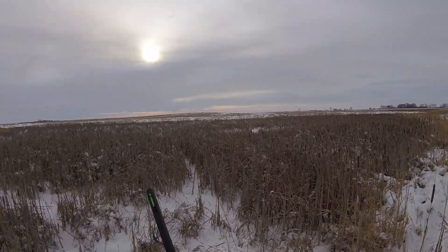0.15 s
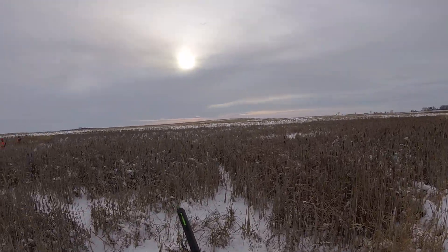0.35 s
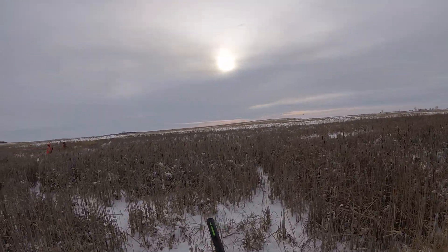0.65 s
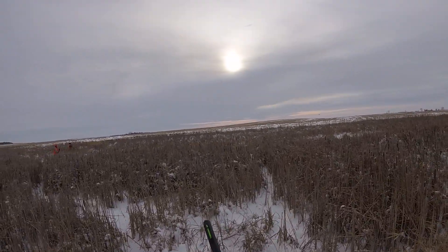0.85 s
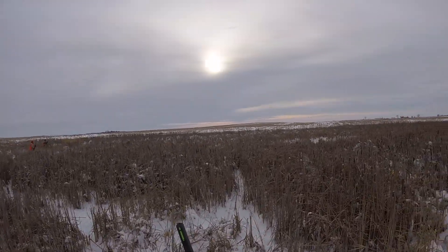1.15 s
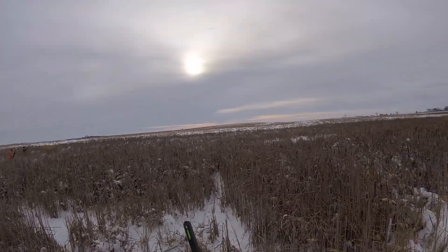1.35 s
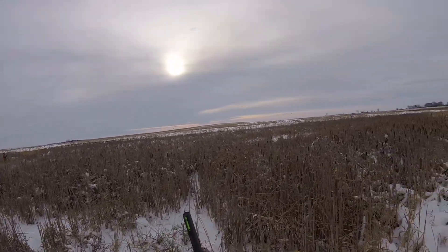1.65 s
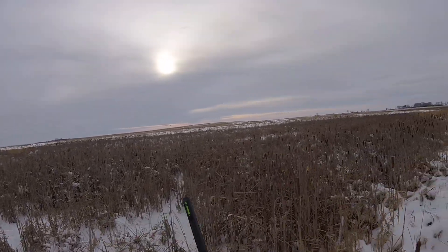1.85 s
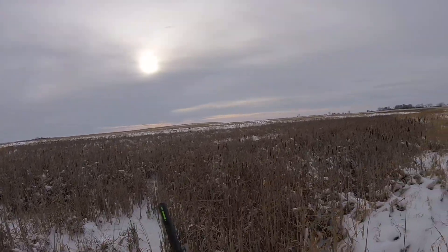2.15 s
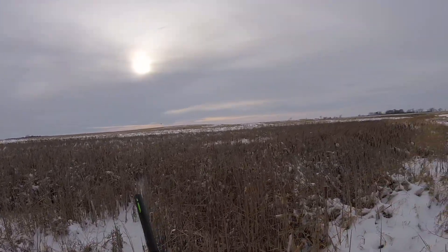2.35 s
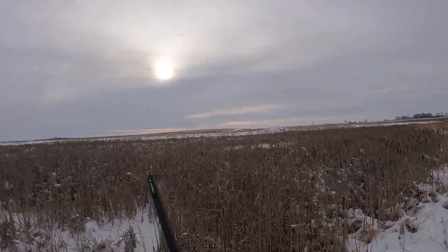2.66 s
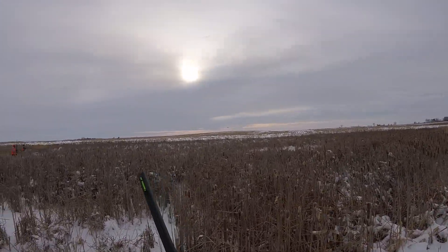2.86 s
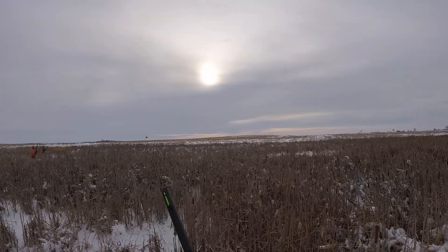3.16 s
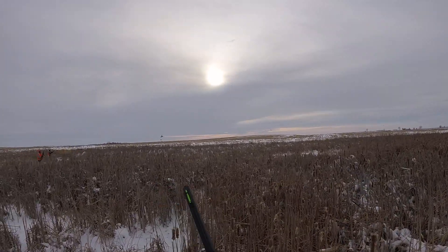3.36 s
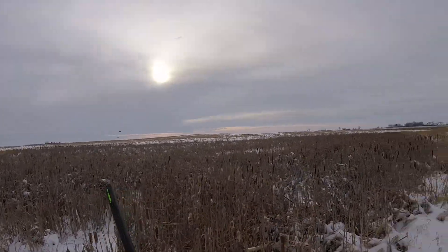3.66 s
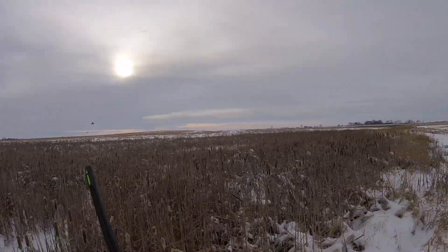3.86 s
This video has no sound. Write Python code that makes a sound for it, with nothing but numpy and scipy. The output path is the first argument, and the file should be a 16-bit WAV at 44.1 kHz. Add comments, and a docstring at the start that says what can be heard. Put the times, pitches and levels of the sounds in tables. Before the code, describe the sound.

Uneven wind noise presses on a close outdoor microphone, light at first, then a heavy thumping gust in the last second or so, while brittle stems tick and crackle through a fine grassy hiss.

```python
"""Wind buffets a small head-worn microphone on an open snowy prairie, for four seconds.
From the start, shaped noise makes a lumpy rumble, a hiss of wind in the grass and a fine crackle of dry reeds.
Soon short swinging waves add thumps and pops, and ringing ticks with noise sprays add snapping stems.
At 2.66 s the head turns and the treble of the reeds changes colour.
Around then the wind builds into a strong gust, with its hardest thump at about 3.3 s."""
import sys
import numpy as np
from scipy import signal
from scipy.fft import rfft, irfft
from scipy.io import wavfile
from scipy.ndimage import uniform_filter1d

SR = 44100
rng = np.random.default_rng(int(sys.argv[2]) if len(sys.argv) > 2 else 0)


def dump(signal):
    """Clip the signal to [-1, 1] and save it as 16-bit WAV at the path in sys.argv[1]."""
    limited = np.clip(np.atleast_2d(signal).T, -1, 1)
    pcm = np.round(limited * 32767).astype(np.int16)
    wavfile.write(sys.argv[1], SR, pcm)


N = 176400  # length in samples: 4 s

# Strength of the buffeting: t/s, deep rumble level/dB, upper flutter level/dB
GUST_LEVELS = [(0,-29.5,-45.5),(.07,-36,-47),(.4,-40.5,-46),(.47,-46.5,-51.5),(.64,-37,-42.5),(.72,-37.5,-45.5),(.78,-32,-34.5),(.86,-38,-44),(1.05,-29,-34.5),(1.12,-23,-35.5),(1.19,-30,-48.5),(1.27,-31.5,-50.5),(1.58,-39.5,-53.5),(1.69,-26.5,-46.5),(1.77,-28,-40.5),(2.02,-35,-46.5),(2.17,-30,-45.5),(2.27,-30.5,-39),(2.5,-27.5,-34),(2.6,-23,-32.5),(2.8,-21.5,-25),(2.86,-16.5,-28),(2.98,-14.5,-21),(3.07,-16.5,-14.5),(3.14,-13,-22.5),(3.27,-15,-27),(3.32,-10,-17.5),(3.42,-21,-26.5),(3.54,-11,-23.5),(3.6,-20.5,-40.5),(3.67,-12,-19.5),(3.77,-21,-37),(3.86,-14.5,-34.5),(3.94,-23,-37.5)]
# Tone of the deep rumble in light air: f/Hz, relative level/dB (per Hz)
RUMBLE_TONE = [(12,6),(33,3.5),(64,-0.5),(90,-10),(130,-32),(400,-61)]
# Tone of the upper flutter: f/Hz, relative level/dB (per Hz)
FLUTTER_TONE = [(60, -56), (110, -2), (170, 4.5), (230, -7.5), (330, -16), (500, -26.5), (900, -41),
                (1500, -46.5), (3000, -96)]
# Wind in the grass, strength of the mid roar: t/s, level/dB
ROAR_LEVELS = [(0,-55.5),(.85,-58),(.95,-55),(1.15,-55),(1.25,-57.5),(1.35,-50.5),(1.41,-54.5),(1.8,-52.5),(2.0,-56.5),(2.07,-54),(2.2,-57.5),(2.6,-53.5),(2.8,-51),(2.86,-49.5),(3.03,-54.5),(3.08,-46),(3.14,-54),(3.27,-48),(3.3,-42.5),(3.4,-48),(3.45,-50.5),(3.75,-51),(3.81,-49.5),(4,-48.5)]
# Tone of that roar: f/Hz, relative level/dB (per Hz)
ROAR_COLOUR = [(120,-36),(250,-6),(650,-10.5),(1000,-11.5),(1450,-15.5),(2000,-19.5),(3000,-24),(4000,-30.5),(4800,-37.5),(6000,-65)]
# Tone of the fine hiss of the air: f/Hz, relative level/dB (per Hz)
HISS_TONE = [(2500,-43),(4000, -33), (6000, -4), (9000, -5.5), (12000, -13), (15300, -15.5)]
# Reeds dragging past the legs: t/s, level/dB
BRUSH_LEVELS = [(0,-64),(.25,-71),(.54,-68),(.6,-61.5),(.66,-70),(1.28,-71.5),(1.36,-62.5),(1.46,-66),(1.52,-60),(1.75,-60),(1.92,-63.5),(2.0,-69),(2.08,-64.5),(2.3,-63),(2.52,-63),(2.6,-55),(2.72,-59),(2.84,-50.5),(2.94,-57),(3.24,-56.5),(3.3,-52),(3.38,-45.5),(3.44,-49),(3.48,-51.5),(3.54,-52.5),(3.6,-53),(3.8,-51.5),(3.86,-54.5),(3.94,-52),(4,-52.5)]
# Tone of the reeds before the head turns: f/Hz, relative level/dB (per Hz)
FACING_AWAY_TONE = [(2240, -8), (3800, -6), (4690, -18), (5210, -10), (5750, -1.5), (6460, 2), (8010, -5.5),
                    (14700, -26), (15300, -44)]
# Tone of the reeds after the head turns: f/Hz, relative level/dB (per Hz)
FACING_IN_TONE = [(2240, -17), (3800, -17), (4370, -18), (5030, -6), (5420, -2), (5950, -8.5), (6530, -5),
                  (7210, -10), (10100, -13.5), (10500, -13.5), (11500, -39), (14000, -28), (15300, -44)]
# Eddies that hit the microphone port: t/s, peak level/dB, f/Hz that the pitch sags towards
THUMP_EVENTS = [(0.204, -40, 240), (0.33, -31, 177), (0.66, -33, 136), (0.773, -23, 138), (1.1, -31, 220),
                (1.709, -20.5, 161), (1.789, -30.5, 146), (2.062, -28.5, 180), (2.612, -25.5, 192),
                (2.775, -21, 230), (2.953, -26, 157), (3.061, -14, 185), (3.312, -8.5, 110.7),
                (3.594, -17, 118), (3.651, -16.5, 152)]
# Stems snapping: t/s, tick level/dB, tick f/Hz, knock level/dB (relative to the tick)
SNAP_EVENTS = [(.301,-44.5,6900,4),(0.6693,-36.5,6700,-5.5),(1.3327,-41,6440,1),(1.341,-44.5,4500,9),(1.3738,-36.5,6500,-12),(1.419,-45,3260,6),(1.496,-41,6300,5),(1.57,-39,5200,4),(1.62,-35,5860,-8),(1.667,-44,11500,-12),(1.885,-42,6040,2),(2.004,-40.5,1780,-3),(2.04,-41,6760,-20),(2.056,-40,6700,-10),(2.456,-33.5,6340,-6.5),(2.7258,-40,6800,-15),(2.7407,-29,6240,-8),(2.7434,-28,6700,-10),(2.763,-32,6400,-20),(2.777,-23.5,7000,-30),(2.8055,-37,6570,-2),(3.066,-35,5470,-1),(3.1861,-33,6500,-24),(3.21,-39,4970,-15),(3.264,-24.5,7850,-8),(3.291,-40,3000,2),(3.301,-34,1500,3),(3.3672,-32,5650,-9),(3.372,-35,1700,-5),(3.438,-33.5,2200,-6),(3.503,-31,6700,-26),(3.5267,-34,7850,-19),(3.561,-37.5,9300,-25),(3.6,-32,5600,-20),(3.6346,-27,5640,-8),(3.637,-31,5640,-22),(3.7,-24,6100,-10),(3.733,-30.5,7300,-25),(3.808,-33,5570,-15),(3.9542,-34,5500,-17)]
# Short pops from the port: t/s, peak level/dB, f/Hz that the pitch sags towards
POP_EVENTS = [(0.309, -43, 910), (0.513, -42.5, 840), (0.673, -35, 290), (0.931, -42.5, 710),
              (1.374, -33.5, 805), (1.939, -40, 610), (2.004, -44, 516), (2.054, -42.5, 1060),
              (2.114, -42, 850), (2.316, -40.5, 590), (2.456, -41, 540), (2.606, -36.5, 325),
              (2.806, -28, 780), (2.907, -33, 530), (2.96, -26, 470), (2.983, -38, 454),
              (3.007, -21.5, 500), (3.0615, -22, 500), (3.0735, -22, 500), (3.0855, -30.5, 600),
              (3.114, -27, 610), (3.67, -35.5, 520)]

LUMPY_DB, FLUTTER_BURST_DB = 5, 2.7  # typical swing of the rumble and of the flutter
STRONG_DB, BRIGHTER = -19, 0.52  # from this rumble level up, its pitch range is wider by this share
EVEN = 0.7  # share 0-1 by which chance peaks of the buffeting are flattened
THUMP_CYCLES, THUMP_GLIDE = 1.59, 0.3  # a larger glide starts higher and sags further
POP_CYCLES, POP_GLIDE = 1.55, 0.23
SHARED_DB, BRUSH_FLICKER_DB = 0.2, 1.5  # flicker of grass and reeds together; extra for the reeds
GRAIN_DB = 2  # fast roughness of the roar
HISS_DB = -65.5
CRACKLES_PER_S, CRACKLE_SPREAD_DB, CRACKLE_SHARE = 600, 3, 0.45  # share 0-1 against smooth swish
TURN_S, TURN_LENGTH_S = 2.66, 0.1  # when the head starts to turn, and for how long
# T60 is the time to fade by 60 dB; spray levels are relative to the tick
SNAP_T60_S, KNOCK_T60_S = 0.0041, 0.0025
CRACK_DB, CRACK_T60_S = -7, 0.001
SPLINTER_DB, SPLINTER_T60_S = -19.5, 0.027
HOUSING_HZ = 12000  # the snaps are dulled above this
EDGE_HZ = 15300


def amp(db):
    """Turns decibels into a plain multiplier."""
    return 10 ** (np.asarray(db) / 20)


def unit(x):
    """Scales a signal to an average (rms) strength of 1."""
    return x / np.sqrt(np.mean(x ** 2) + 1e-20)


def on_hz(points, hz):
    """Reads a tone table at any pitch, with silence outside its ends."""
    f, db = np.transpose(points)
    return np.interp(np.log(hz + 1), np.log(f + 1), db, -np.inf, -np.inf)


def level(table, column=1):
    """Joins the levels of a table into a smooth volume curve."""
    rows = np.array(table)
    return amp(np.interp(np.arange(N) / SR, rows[:, 0], rows[:, column]))


def colour(x, points):
    """Filters a signal with the tone in a table, at rms 1."""
    gain = amp(on_hz(points, np.fft.rfftfreq(N, 1 / SR)))
    return unit(irfft(rfft(x) * gain, N))


def wobble(top_hz):
    """Makes a random wander of rms 1, faster than 6.5 Hz and fading out above top_hz."""
    spectrum = rfft(rng.standard_normal(N))
    hz = np.fft.rfftfreq(N, 1 / SR)
    return unit(irfft(spectrum * (hz > 6.5) / (1 + (hz / top_hz) ** 2), N))


def evened(x, span_s):
    """Pulls the short-time level of x part of the way to 1."""
    span = round(span_s * SR)
    power = uniform_filter1d(uniform_filter1d(x ** 2, span), span)
    return unit(x / (power + 0.071) ** (EVEN / 2))


def add(mix, s, sound):
    """Adds a short sound to the mix at s seconds."""
    part = mix[round(s * SR):][:len(sound)]
    part += sound[:len(part)]


def wavelet(db, hz, cycles, glide, phase):
    """A few swings of pressure that rise fast, sag in pitch and die away."""
    u = np.arange(0, 2, hz / cycles / SR)  # time, in units of the given number of cycles
    turns = cycles * (u + glide * (1 - np.exp(-3 * u)))
    envelope = 3 * u * np.exp(1 - 3 * u)  # peaks at 1
    return amp(db) * envelope * np.sin(2 * np.pi * (turns + phase))


def wavelets(table, cycles, glide):
    """Places one wavelet per table row, each starting at a random point of its swing."""
    out = np.zeros(N)
    for (s, db, hz), phase in zip(table, rng.random(len(table))):
        add(out, s, wavelet(db, hz, cycles, glide, phase))
    return out


def buffeting():
    """Lumpy pressure on the port: a deep rumble, and a flutter that comes in bursts."""
    bursts = wobble(top_hz=19.5)
    eddies = rng.standard_normal(N) * amp(LUMPY_DB * wobble(top_hz=6.9))
    wide_tone = [(hz * (1 + BRIGHTER), db) for hz, db in RUMBLE_TONE]
    rumble_level = level(GUST_LEVELS, column=1)
    # stronger wind blends towards the wider pitch range
    strong = np.clip(rumble_level / amp(STRONG_DB), 0, 1)
    deep = (1 - strong) * colour(eddies, RUMBLE_TONE) + strong * colour(eddies, wide_tone)
    upper = colour(rng.standard_normal(N) * amp(FLUTTER_BURST_DB * bursts), FLUTTER_TONE)
    rumble = evened(deep, 0.038) * rumble_level
    flutter = evened(upper, 0.11) * level(GUST_LEVELS, column=2)
    return rumble + flutter


def grass_wind(flicker):
    """Wind through the grass makes a rough roar; the air adds a fine, steadier hiss."""
    grain = amp(GRAIN_DB * wobble(top_hz=89))
    roar = colour(rng.standard_normal(N) * flicker * grain, ROAR_COLOUR) * level(ROAR_LEVELS)
    hiss = colour(rng.standard_normal(N) * flicker ** 0.55, HISS_TONE)
    return roar + amp(HISS_DB) * hiss


def brushing(flicker):
    """Dense tiny cracks of dry leaves blended with swish, heard through the microphone housing."""
    hits = rng.random(N) < CRACKLES_PER_S / SR
    loudness = amp(CRACKLE_SPREAD_DB * np.minimum(rng.exponential(1, N), 4.2))
    fade = np.exp(-1 / (0.0004 * SR))  # each crack dies away within a few 0.4 ms steps
    cracks = signal.lfilter([1], [1, -fade], hits * loudness) * rng.standard_normal(N)
    swish = rng.standard_normal(N)
    reeds = (CRACKLE_SHARE * unit(cracks) + (1 - CRACKLE_SHARE) * swish) * flicker
    # the turn crossfades from one treble colour to the other
    turned = np.clip((np.arange(N) / SR - TURN_S) / TURN_LENGTH_S, 0, 1) * np.pi / 2
    away = np.cos(turned) * colour(reeds, FACING_AWAY_TONE)
    facing = np.sin(turned) * colour(reeds, FACING_IN_TONE)
    return (away + facing) * level(BRUSH_LEVELS)


def thumps():
    """Eddies hit the port, each a low swing of pressure that soon dies away."""
    return wavelets(THUMP_EVENTS, THUMP_CYCLES, THUMP_GLIDE)


def snaps():
    """Each stem gives a ringing tick, a duller knock and a spray of splinters."""
    out, t = np.zeros(N), np.arange(2000) / SR
    band = signal.butter(3, [4800, 11500], "band", fs=SR)
    rise = np.sin(np.minimum(t / 0.00022, 1) * np.pi / 2) ** 2  # soft start of 0.22 ms
    crack_fade = amp(CRACK_DB - 60 * t / CRACK_T60_S)
    splinter_fade = amp(SPLINTER_DB - 60 * t / SPLINTER_T60_S)
    noises = rng.standard_normal((len(SNAP_EVENTS), len(t)))
    for (s, db, hz, knock_db), noise in zip(SNAP_EVENTS, noises):
        tick = np.sin(2 * np.pi * hz * t) * amp(-60 * t / SNAP_T60_S)
        knock = np.sin(2 * np.pi * 2300 * t) * amp(knock_db - 60 * t / KNOCK_T60_S)
        spray = unit(signal.lfilter(*band, noise)) * (splinter_fade + crack_fade)
        add(out, s, amp(db) * rise * (tick + knock + spray))
    return signal.lfilter(*signal.butter(2, HOUSING_HZ, fs=SR), out)


def pops():
    """Short pops from the port, mostly higher in pitch than the thumps."""
    return wavelets(POP_EVENTS, POP_CYCLES, POP_GLIDE)


def scene():
    """Adds all the layers; grass and reeds share one faint flicker."""
    flicker = amp(SHARED_DB * wobble(top_hz=32.3))
    reed_flicker = flicker * amp(BRUSH_FLICKER_DB * wobble(top_hz=39))
    wind = buffeting() + grass_wind(flicker)
    reeds = brushing(reed_flicker)
    return (wind + reeds + thumps() + snaps() + pops())[None]


def record(dry):
    """The recorder's band limit: a steep filter removes the sound above EDGE_HZ."""
    taps = signal.firwin(1023, EDGE_HZ, window=("kaiser", 9), fs=SR)
    return signal.oaconvolve(dry, taps[None], "same")


dry = scene()
out = record(dry)
dump(out)
```